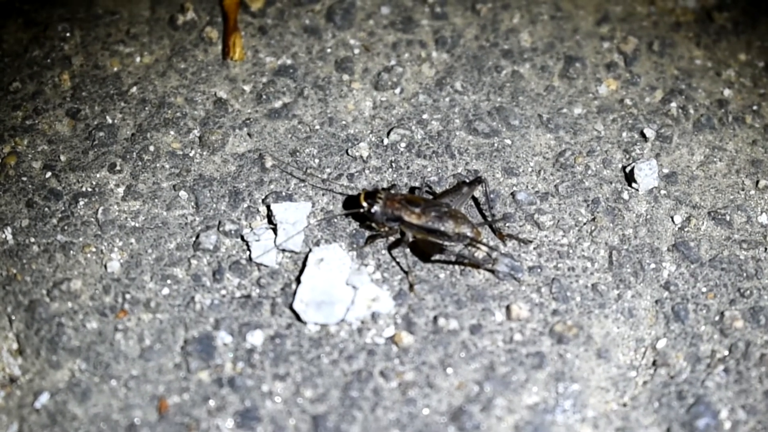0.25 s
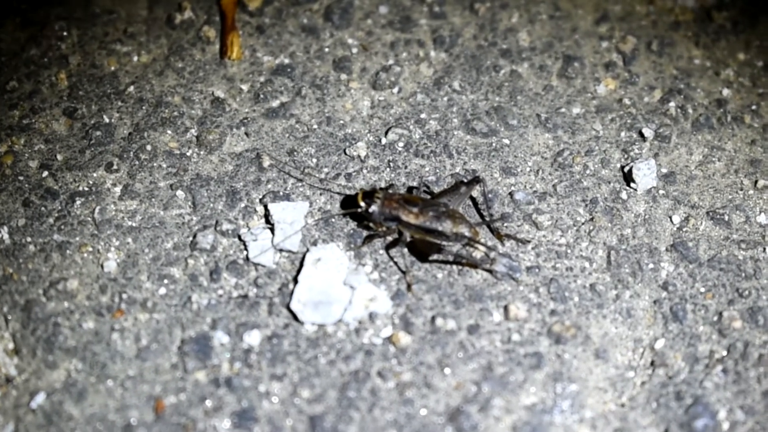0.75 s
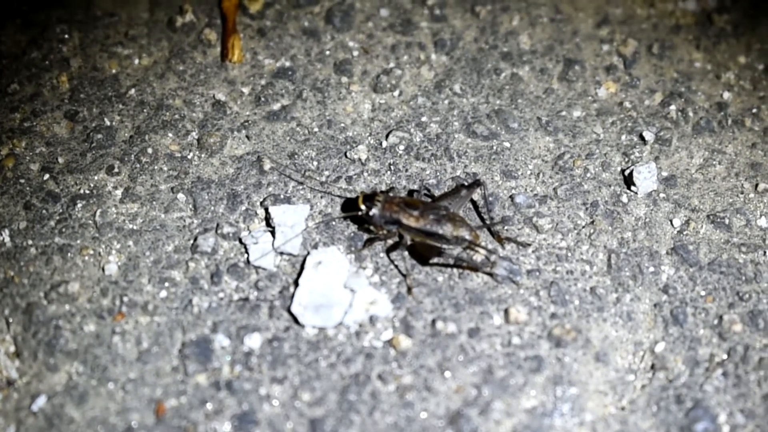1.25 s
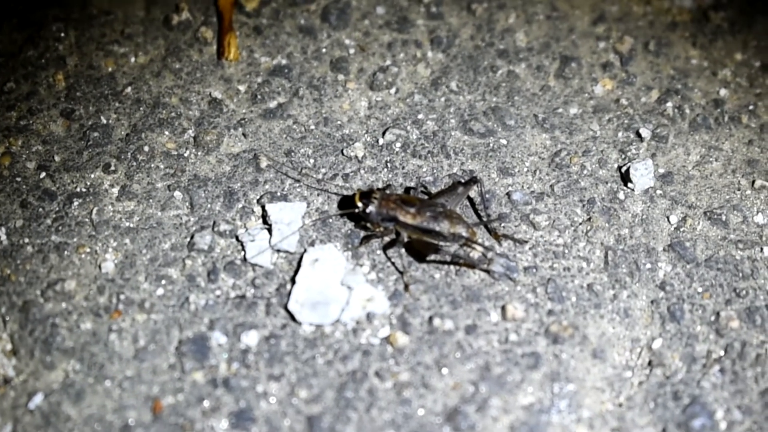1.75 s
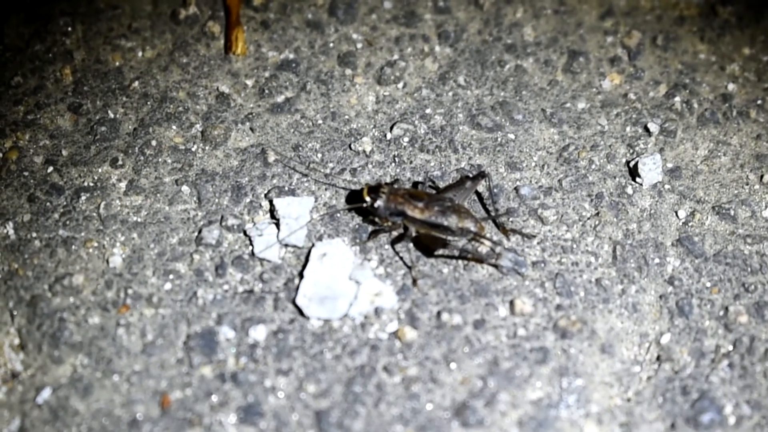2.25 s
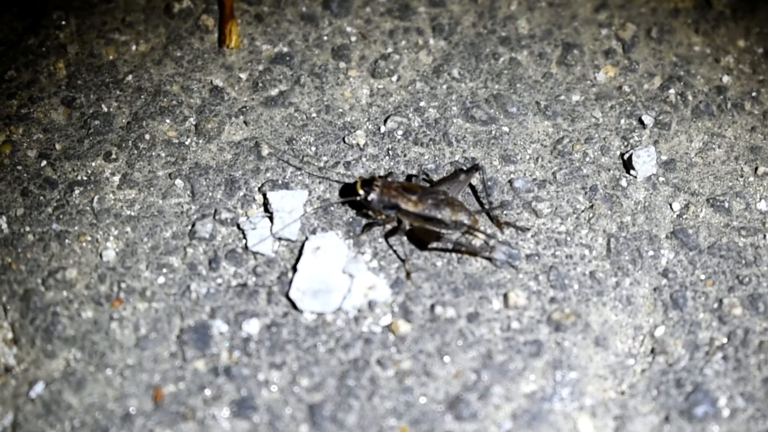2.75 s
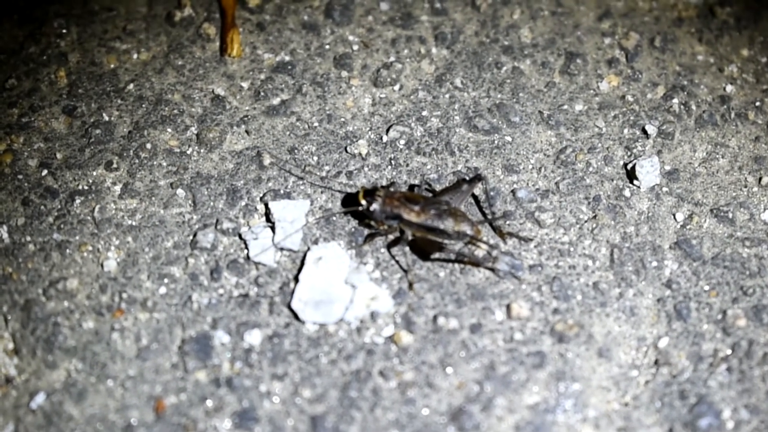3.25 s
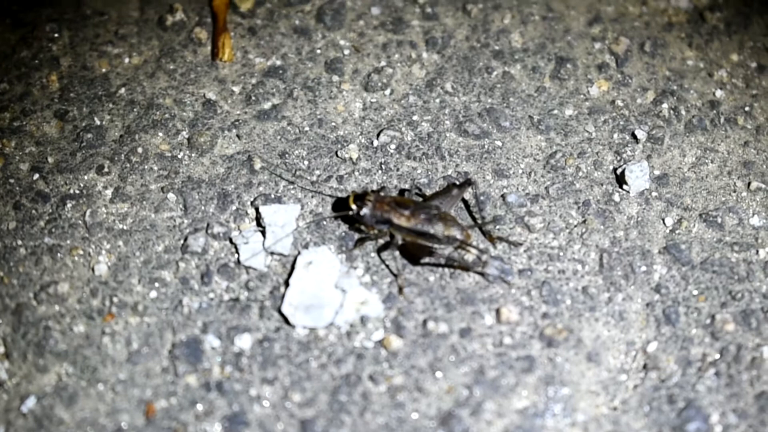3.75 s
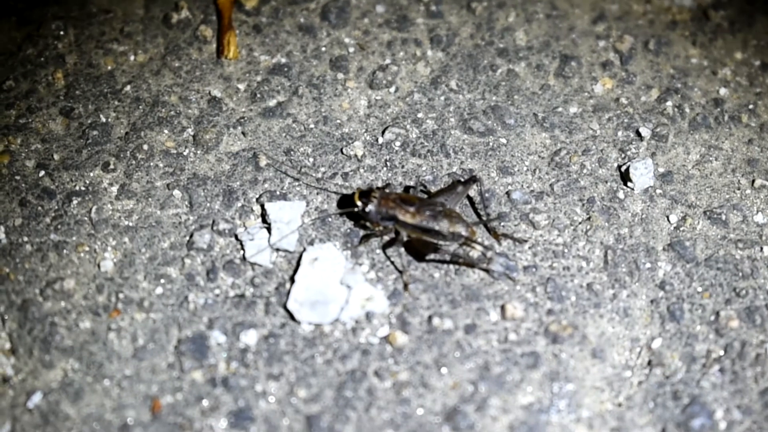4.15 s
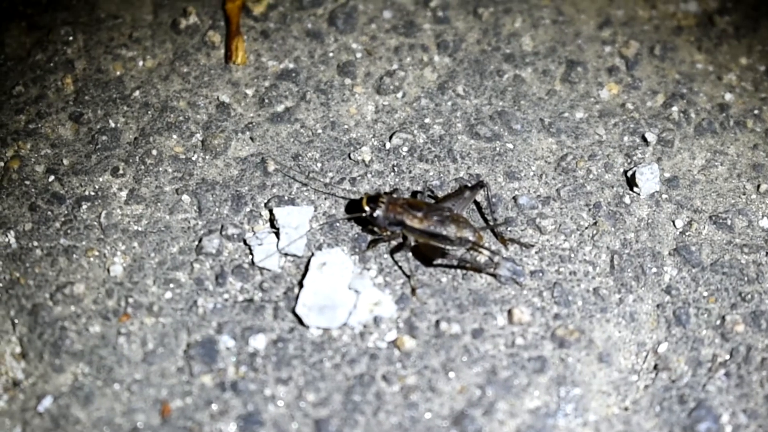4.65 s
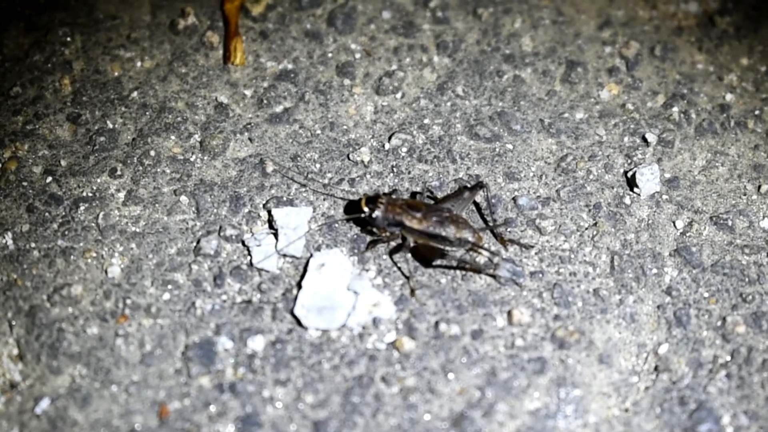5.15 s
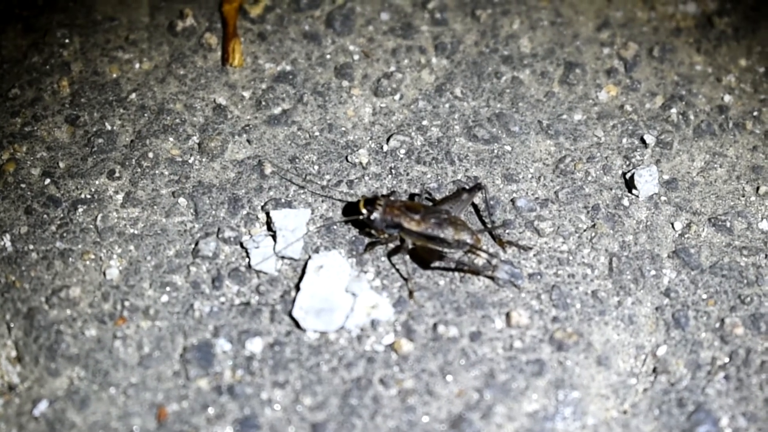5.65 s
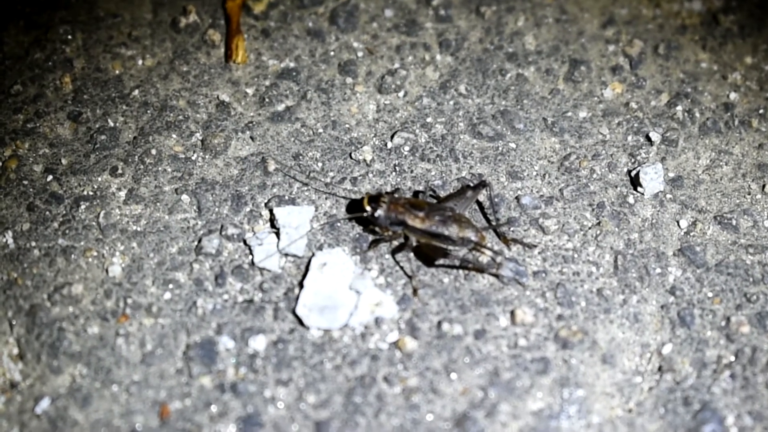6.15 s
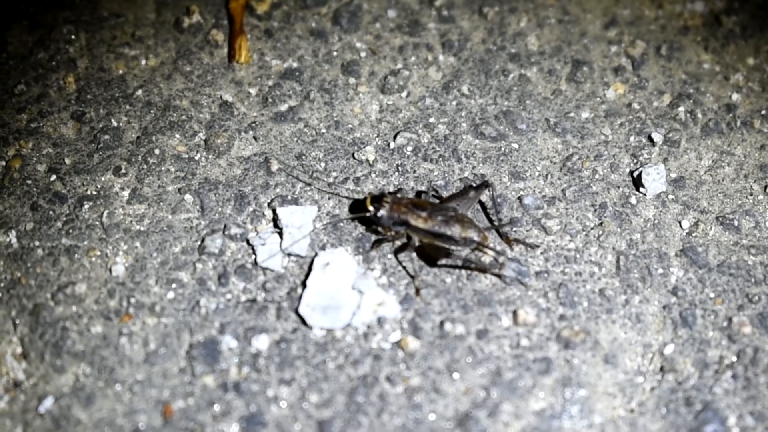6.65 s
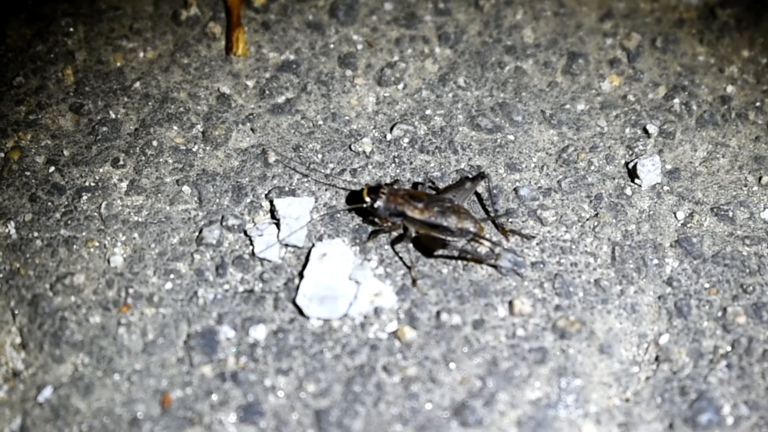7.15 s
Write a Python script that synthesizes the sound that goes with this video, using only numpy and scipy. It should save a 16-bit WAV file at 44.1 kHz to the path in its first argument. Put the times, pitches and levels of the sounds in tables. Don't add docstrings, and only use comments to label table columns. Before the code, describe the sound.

A close cricket chirps bright, ringing trills on concrete at night, breaking into two longer even trills over faint traffic and hiss.

```python
import sys
import numpy as np
from scipy import signal
from scipy.fft import rfft, irfft, next_fast_len
from scipy.io import wavfile

SR = 44100
rng = np.random.default_rng(int(sys.argv[2]) if len(sys.argv) > 2 else 0)


def boost(x):
    u = np.asarray(x, float) / 20
    return 10 ** u


def generate_wav(sig):
    pcm = np.round(np.clip(np.atleast_2d(sig).T, -1, 1) * 32767).astype(np.int16)
    wavfile.write(sys.argv[1], SR, pcm)


N = 327222

# (start t/s, length/ms, pitch f/Hz, peak level/dB)
TRIES = [
    (2.032, 24, 3480, -27),
    (2.074, 30.6, 3570, -28),
    (4.907, 40, 3543, -26),
    (4.956, 31, 3538, -23),
]
# (first stroke t/s, last stroke t/s, last stroke length/ms, pitch f/Hz, peak level/dB)
CHIRPS = [(-0.017, 0.066, 42.7, 3808, -17), (0.164, 0.202, 41.6, 3829, -18),
          (0.316, 0.398, 37.7, 3760, -18), (2.759, 2.883, 46, 3860, -17.5), (2.97, 3.053, 43.7, 3856, -17),
          (3.147, 3.228, 42.6, 3838, -16.5), (3.322, 3.409, 43.5, 3856, -17),
          (3.513, 3.553, 43.4, 3805, -17.5), (3.66, 3.697, 41.7, 3803, -16.5),
          (3.822, 3.907, 36.7, 3747, -18), (5.657, 5.876, 41, 3842, -17.5), (5.971, 6.105, 41.4, 3835, -17),
          (6.207, 6.289, 41.4, 3806, -18), (6.398, 6.484, 37, 3738, -18), (6.603, 6.647, 39.2, 3755, -18)]


def unit_power(x):
    return x / np.sqrt(np.mean(x ** 2) + 1e-20)


def response(points, size):
    hz, *columns = np.transpose(points)
    grid = np.log(np.fft.rfftfreq(size, 1 / SR) + 1)
    return np.array([boost(np.interp(grid, np.log(hz), c)) for c in columns])


def coloured_noise(points):
    gains = response(points, N)
    white = rng.standard_normal((len(gains), N))
    return unit_power(irfft(rfft(white) * gains, N))


def drift(rate):
    knots = rng.standard_normal(int(N / SR * rate) + 2)
    return np.interp(np.arange(N) / SR * rate, np.arange(len(knots)), knots)


def ring(clicks, hz, t60):
    r, w = boost(-60 / (t60 * SR)), 2 * np.pi * hz / SR
    return signal.lfilter([0, np.sin(w)], [1, -2 * r * np.cos(w), r * r], clicks + 1e-18)


def far_cricket(first, period, length, per_s, hz, fall_hz, t60, left_db, right_db):
    since = (np.arange(N) / SR - first) % period
    flicker = boost(1.5 * drift(6) + 2.5 * drift(60))
    chirp = np.sin(np.pi * np.clip(since / length, 0, 1)) ** .5 * flicker
    share = per_s * since % 1
    pitch = hz - fall_hz * share + 45 * drift(80)
    pulses = np.sin(np.pi * share) * np.sin(2 * np.pi * np.cumsum(pitch) / SR)
    age = np.arange(SR // 4) / SR
    echoes = rng.standard_normal((2, len(age))) * boost(-60 * age / t60)
    left, right = signal.fftconvolve([chirp * pulses], echoes, axes=1)[:, :N]
    return np.array([boost(left_db) * unit_power(left), boost(right_db) * unit_power(right)])


def far_crickets():
    # (first chirp t/s, period/s, chirp length/s, pulse rate/Hz, pitch f/Hz, fall/Hz, blur t60/s,
    #  left level/dB, right level/dB)
    singers = [
        (-.045, .191, .12, 85, 5150, 480, .2, -61.5, -68),
        (-.06, .26, .15, 22, 3950, 700, .45, -65, -69),
    ]
    return sum(far_cricket(*row) for row in singers)


def wing_lift():
    lead_s, t60_s, peak_db = .016, 0.1, -49
    t, level = np.arange(N) / SR, np.zeros(N)
    for first, *_ in CHIRPS + TRIES[::2]:
        age = t - first + lead_s
        level += (age > 0) * boost(peak_db - 60 * np.abs(age) / t60_s)
    return level * unit_power(ring(rng.standard_normal(N), hz=13600, t60=.001))


def strokes():
    # (first stroke t/s, last stroke t/s, full effort pitch f/Hz)
    trills = [
        (2.151, 2.677, 3924),
        (5.045, 5.563, 3929),
    ]
    trill_beat_s, trill_ms, trill_db = .075, 51.7, -15.5
    warm_ms, warm_hz, warm_db, warm_keeps = -14.5, -240, -9.5, 0.36
    chirp_beat_s, opening_s, reopen_ms = .043, .039, 10
    opener_hz, opener_db, middle_db, closer_hz = -35, -5.5, -0.97, -12
    usual_fall, opener_fall, slack_fall = 5.99, 6.6, 3.8

    rows = [(s, ms, hz, slack_fall, db) for s, ms, hz, db in TRIES]
    for first, last, hz in trills:
        count = round((last - first) / trill_beat_s) + 1
        for k, s in enumerate(np.linspace(first, last, count)):
            cold = warm_keeps ** k
            rows.append((s, trill_ms + warm_ms * cold, hz + warm_hz * cold, usual_fall,
                         trill_db + warm_db * cold))
    for first, last, last_ms, hz, db in CHIRPS:
        later = np.linspace(last, first + opening_s, round((last - first) / chirp_beat_s))[::-1]
        tired = any(0 < first - trill[1] < 2 * trill_beat_s for trill in trills)
        rows.append((first, 1000 * (later[0] - first) - reopen_ms, hz + opener_hz * (not tired),
                     slack_fall if tired else opener_fall, db + opener_db))
        for s, after in zip(later, later[1:]):
            rows.append((s, 1000 * (after - s) - reopen_ms, hz, usual_fall, db + middle_db))
        rows.append((last, last_ms, hz + closer_hz, usual_fall, db))
    return rows


def cricket():
    # (share of the stroke, level/dB)
    stroke_shape = [(0, -30), (.06, -12), (.15, -7), (.35, -2), (.5, -1), (.75, -1), (.87, -3), (.95, -9),
                    (1, -30)]
    # (share of the stroke, level/dB)
    rasp_shape = [(0, 1.5), (.05, 6), (.15, -3), (.4, -2.5), (.75, -0.5), (.92, 2), (1, -7.5)]
    # (multiple of the pitch, level/dB, share of effort followed, swell/dB, flicker/dB)
    overtones = [(1, 0, 1.0, 0.5, 2.17), (2, -30, 0.55, -17.5, 4.5), (3, -25, 0.4435, 1, 3.5),
                 (4, -48, 0.2, 8, 8.5)]
    # (f/Hz, level/dB per Hz)
    scrape_colour = [(2500, -20.5), (3600, -0.5), (4400, -4.5), (5100, 7), (5700, -15.5), (6400, -7.5),
                     (7500, -7), (9000, 5.5), (11000, -6), (12500, -3.5), (14000, -10.5), (16000, -25)]
    catch_hz, catch_hz_per_ms, last_fall, wobble_hz = -250, 6.0, 1.15, 7.83
    rasp_db, rasp_db_per_ms = -39, -0.2218
    edge, entry, usual_ms = 0.61, 0.29, 38

    pitch, effort_db, progress, shape, rasp, long = np.zeros((6, N))
    for s, ms, early_hz, fall, peak_db in strokes():
        at = np.arange(round(s * SR), round((s + ms / 1000) * SR))
        share = np.linspace(0, 1, len(at))[at >= 0]
        at = at[at >= 0]
        late_hz = early_hz - fall * ms
        start_hz = early_hz + catch_hz + catch_hz_per_ms * ms
        end_hz = late_hz - last_fall * (early_hz - late_hz)
        bend = np.polyfit([0, 1 / 3, 2 / 3, 1], [start_hz, early_hz, late_hz, end_hz], 3)
        pitch[at] = np.polyval(bend, share)
        effort_db[at], progress[at] = peak_db, share
        long[at] = share * ms / usual_ms - .5
        shape[at] = boost(np.interp(share, *np.transpose(stroke_shape)))
        stroke_rasp_db = np.interp(share, *np.transpose(rasp_shape))
        rasp[at] = boost(stroke_rasp_db + rasp_db_per_ms * ms)
    phase = 2 * np.pi * np.cumsum(pitch + wobble_hz * drift(300)) / SR

    tone = 0
    for k, db, follow, swell_db, flicker_db in overtones:
        level = boost(db + follow * effort_db + swell_db * long + flicker_db * drift(300 * k))
        body = shape if k < 2 else shape ** edge
        if k > 2.5:
            body = body * np.minimum(progress / entry, 1)
        tone = tone + level * body * np.sin(round(k) * phase)
    grain = boost(4.5 * drift(200))
    scrape = boost(rasp_db) * grain * coloured_noise(scrape_colour)[0]
    return tone + rasp * scrape


def surroundings(x):
    # (delay t/ms, level/dB)
    paths_left = [(-0.956, -16.2), (0.207, -9.5), (1.928, -8.3), (3.606, -5.7), (5.256, -9.8),
                  (7.345, -13.3), (9.635, -14.7), (10.944, -5.8), (12.269, -19.5), (15.638, -13.5),
                  (17.084, -17.9), (19.194, -21.2), (24.752, -17.7), (27.368, -18.8), (37.662, -18.8),
                  (38.954, -22.8)]
    paths_right = [(-1.551, -22.1), (-0.271, 0.4), (2.0, -17.9), (4.754, -23.4), (6.864, -19.2),
                   (10.231, -23.2), (12.806, -15.9), (15.305, -17.2), (17.292, -25.0), (19.132, -16.9),
                   (21.153, -24.5), (22.859, -23.6), (24.553, -20.7), (28.026, -25.5), (30.869, -22.5),
                   (36.339, -24.8)]
    # (t60/s, left level/dB, right level/dB)
    yard = [(.15, -15, -18), (.5, -24, -26)]
    # (f/Hz, level/dB per ms)
    echo_dulling = [(4200, 0), (7500, -0.0607), (11000, -0.0539), (14000, -0.0163)]
    # (f/Hz, left level/dB, right level/dB)
    colour = [(1490, -46, -59), (2943, -10, -15), (3070, 6, -11), (3250, -1.5, -3), (4370, 0.5, 1),
              (6600, -4.5, 0.5), (6780, 4, 4.5), (7540, 4, 4), (8180, -7.5, -12), (10340, -16, -12.5),
              (11015, -1, 4.5), (12070, -10.5, -7.5), (13630, 6, 6), (15900, -9, -16.5)]
    scatter_s = 0.0045

    size = next_fast_len(N + SR)
    hz, age = np.fft.rfftfreq(size, 1 / SR), np.arange(SR // 2) / SR
    dulling = response(echo_dulling, size)[0]
    ears = []
    for ear, paths in enumerate((paths_left, paths_right)):
        distinct = 0
        for ms, db in paths:
            delay = np.exp(-2j * np.pi * hz * (ms / 1000))
            distinct = distinct + boost(db) * dulling ** ms * delay
        tails = 0
        for t60, *levels in yard:
            even_power = np.sqrt(np.log(1e6) / t60 / SR)
            tails = tails + boost(levels[ear] - 60 * age / t60) * rng.standard_normal(len(age)) * even_power
        build_up = np.minimum(age / scatter_s, 1) ** 2
        ears.append(distinct + dulling ** 30 * rfft(tails * build_up, size))
    return irfft(rfft(x, size) * np.array(ears) * response(colour, size), size)[:, :N]


def distant_road():
    # (t/s, level/dB)
    swell = [
        (0.0, -61.5),
        (0.6, -65.5),
        (1.32, -68.5),
        (3.55, -69.5),
        (4.26, -75.5),
        (5.19, -71),
        (5.9, -62.5),
        (6.96, -58.5),
        (7.42, -58.5),
    ]
    # (f/Hz, left level/dB per Hz, right level/dB per Hz)
    road_colour = [(150, -34, -41), (430, -45, -31.5), (880, -7.5, -24), (1480, -3, -15),
                   (2460, -3.5, -16.5), (4570, -1, -10), (8260, -4.5, -13), (11900, -9.5, -11.5),
                   (16000, -32.5, -17.5)]
    level_db = np.interp(np.arange(N) / SR, *np.transpose(swell))
    return boost(level_db + 7.5 + 0.49 * drift(11)) * coloured_noise(road_colour)


def microphone_hiss():
    # (f/Hz, left level/dB per Hz, right level/dB per Hz)
    hiss_colour = [(30, -48, -51), (120, -54, -35), (247, -20.5, -31), (594, -7.5, -13), (1446, -2.5, -7),
                   (2840, -17, -12), (4570, 0, -9.5), (7900, -2, -29), (8300, -9.5, -14), (12100, -4, -4),
                   (16300, -3, -8)]
    return boost(-57) * coloured_noise(hiss_colour)


def katydid(buzzes, per_s, hz, t60, right_db):
    ramp_share = 0.16
    t = np.arange(N) / SR
    level = 0
    for s, length, db in buzzes:
        to_edge = np.minimum(t - s, s + length - t)
        level = level + boost(db) * np.clip(to_edge / (ramp_share * length), 0, 1)
    clicks = np.diff(np.floor(np.arange(N + 1) * per_s / SR))
    buzz = unit_power(ring(ring(clicks, hz, t60), hz, t60)) * level
    return np.array([buzz, boost(right_db) * np.roll(buzz, -8)])


def katydids():
    # (t/s, length/s, level/dB)
    high = [
        (.67, .36, -58.5),
        (1.85, 0.21, -60),
        (4.08, .38, -66),
    ]
    low = [
        (.92, 0.15, -66),
        (1.62, .22, -69),
        (4.6, 0.1, -69),
    ]
    return (katydid(high, per_s=300.8, hz=12650, t60=.0028, right_db=-5)
            + katydid(low, per_s=346.5, hz=10800, t60=.0022, right_db=-1.5))


def ticks():
    # (t/s, peak level/dB)
    tick_rows = [
        (1.935, -31.5),
        (4.894, -49),
    ]
    crumble_s = 0.02
    out = np.zeros(N)
    age = np.arange(SR // 20) / SR
    for s, db in tick_rows:
        at = round(s * SR)
        crumbs = rng.standard_normal(len(age)) * (rng.random(len(age)) < .3)
        out[at:at + len(age)] += boost(db) * crumbs * np.exp(-age / crumble_s)
    out = signal.sosfilt(signal.butter(2, 2500, "high", fs=SR, output="sos"), out)
    return np.array([out, boost(-11) * np.roll(out, -8)])


def scene():
    near = surroundings(wing_lift() + cricket())
    return far_crickets() + near + distant_road() + microphone_hiss() + katydids() + ticks()


def roll_off(x):
    return signal.sosfilt(signal.butter(12, 15800, fs=SR, output="sos"), x)


def record(dry):
    shared_hz, shared, low_cut_hz = 350, .35, 140
    low = signal.sosfilt(signal.butter(2, shared_hz, fs=SR, output="sos"), dry)
    wet = dry + shared * (low[::-1] - low)
    wet = signal.sosfilt(signal.butter(2, low_cut_hz, "high", fs=SR, output="sos"), wet)
    wet = signal.sosfilt(signal.cheby2(14, 60, 16500, fs=SR, output="sos"), wet)
    return roll_off(wet)


dry = scene()
out = record(dry)
generate_wav(out)
```